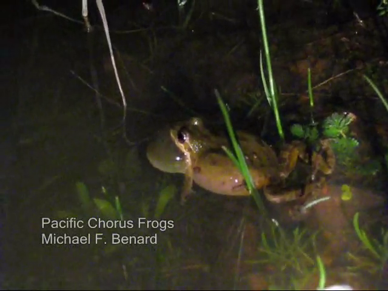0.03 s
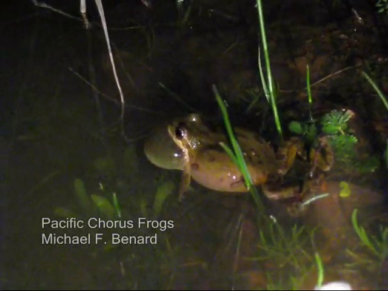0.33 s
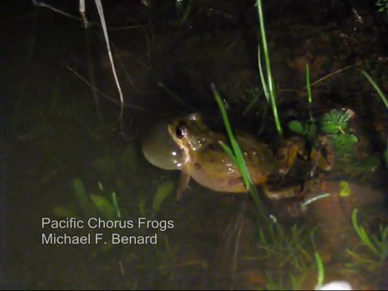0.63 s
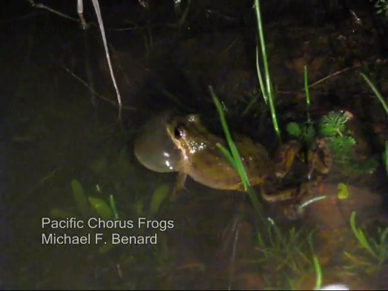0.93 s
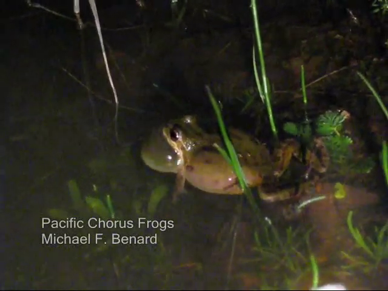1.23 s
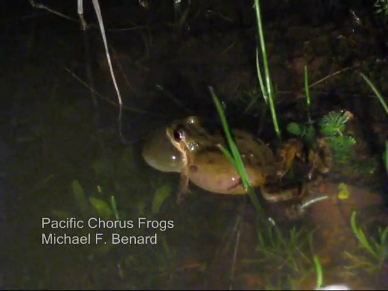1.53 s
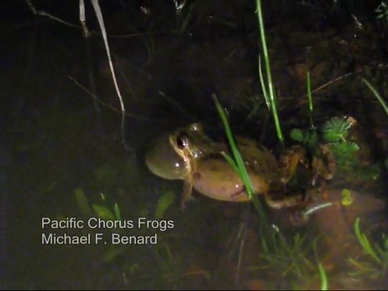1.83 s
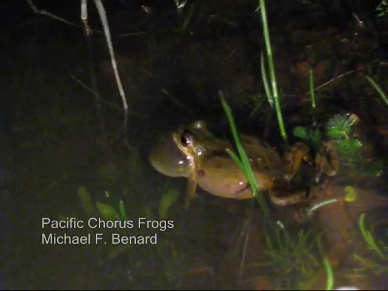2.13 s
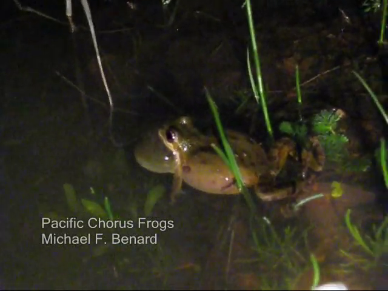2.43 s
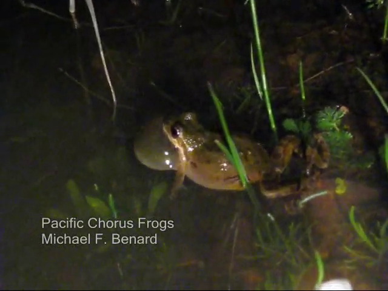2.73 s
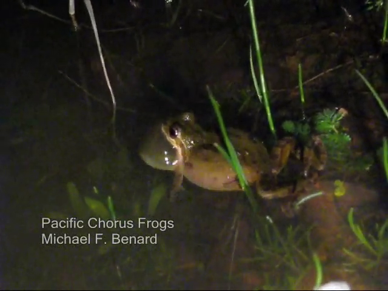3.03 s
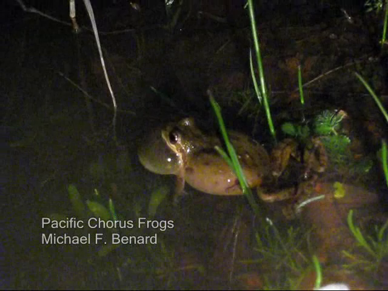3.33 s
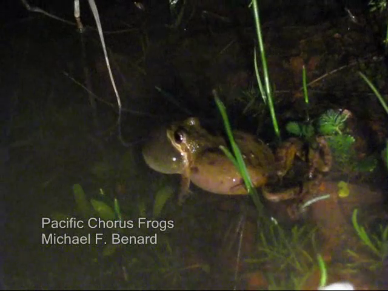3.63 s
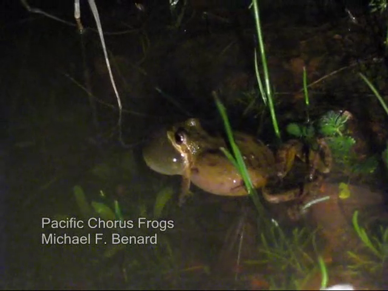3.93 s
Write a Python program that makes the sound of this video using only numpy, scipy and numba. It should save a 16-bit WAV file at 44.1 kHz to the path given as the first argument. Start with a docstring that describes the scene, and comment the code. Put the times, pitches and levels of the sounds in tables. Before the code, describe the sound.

Frogs croak in high, rapid pulses, near and far, beside water at night. Three brief chirps from a nearby frog alternate with two loud rising trills at the microphone, each briefly pushing down the chorus, over faint hiss.

```python
"""A chorus of frogs trills around a pond at night, over a faint hiss. Every call is a train of short
ringing pulses from a vocal sac, most often climbing in pitch. Neighbours and a far crowd form the bed;
one close frog gives three short notes, and another, right at the microphone, calls twice.
The recorder's gain control ducks the chorus under each close call and lets it swell back."""
import sys
import numpy as np
from scipy import signal
from scipy.fft import rfft, irfft
from scipy.io import wavfile
from scipy.ndimage import uniform_filter1d
from numba import njit

SR = 44100
rng = np.random.default_rng(int(sys.argv[2]) if len(sys.argv) > 2 else 0)


def inscribe(sig):
    """Save sig as 16-bit PCM at rate SR to the path in sys.argv[1].

    A 1-D sig is mono; a 2-D sig holds one channel per row.
    Samples are clipped to [-1, 1] before scaling.
    """
    pcm = np.round(np.clip(np.atleast_2d(sig).T, -1, 1) * 32767)
    wavfile.write(sys.argv[1], SR, pcm.astype(np.int16))


N = 176400


def amp(db):
    return 10 ** (np.asarray(db) / 20)


def unit_rms(x):
    return x / np.sqrt(np.mean(x ** 2) + 1e-20)


def add(mix, start_s, sound):
    """Lays a sound into the mix, trimming what overhangs either end."""
    at = int(round(start_s * SR))
    sound = sound[max(-at, 0):]
    part = mix[max(at, 0):][:len(sound)]
    part += sound[:len(part)]


def noise(spectrum):
    """Noise of unit level, coloured by an EQ curve."""
    hz, db = np.transpose(spectrum)
    shape = amp(np.interp(np.log(np.fft.rfftfreq(N, 1 / SR) + 1), np.log(hz), db))
    return unit_rms(irfft(rfft(rng.standard_normal(N)) * shape, N))


def pond(x, wet_db, t60_s=.081):
    """Adds short scattered echoes from water, bank and plants."""
    t = np.arange(SR // 4) / SR
    echoes = rng.standard_normal(len(t)) * (rng.random(len(t)) < .05) * amp(-60 * t / t60_s)
    return x + amp(wet_db) * signal.fftconvolve(x, echoes / np.linalg.norm(echoes))[:N]


def sac_pulse(hz, swell_ms, decay_ms, voice_db, edge, attack_ms=.18, length_ms=17, fade_ms=4.2):
    """One pulse of the vocal sac: it snaps on, swells, rings down and stops."""
    ms = np.arange(0, length_ms, 1000 / SR)
    snap = edge ** swell_ms  # a slow swell starts softer
    swell = snap + (1 - snap) * np.sin(np.pi / 2 * np.minimum(ms / swell_ms, 1))
    attack = 1 - np.exp(-ms / attack_ms)
    decay = np.exp(-np.maximum(ms - swell_ms, 0) / decay_ms)
    fade = np.minimum((length_ms - ms) / fade_ms, 1)
    phase = np.pi * hz * np.arange(len(ms)) / SR  # partials at 1/2, 1, 3/2 and 2 times the pitch
    tone = sum(amp(db) * np.sin((k + 1) * phase) for k, db in enumerate(voice_db))
    return attack * swell * decay * fade * tone


def far_call(count, rate_hz, first_hz, last_hz, first_db, last_db, tones=(), jitter_s=.0003):
    """A farther frog's call: slightly uneven pulses that glide in pitch and level."""
    # partials of a far voice: level_db
    voice_db = [-12, -0.5, -26, -47]
    out, count = np.zeros(SR // 2), round(count)
    for k, (late, loud) in enumerate(rng.standard_normal((count, 2))):
        progress = k / max(count - 1, 1)
        start_s = k / rate_hz + jitter_s * late
        hz = first_hz + progress * (last_hz - first_hz)
        gain = amp(first_db + progress * (last_db - first_db) + 1.26 * loud)
        add(out, start_s, gain * sac_pulse(hz, swell_ms=2.32, decay_ms=2.07, voice_db=voice_db, edge=.68))
        if len(tones):
            add(out, start_s, gain * recorder_tones(hz, tones))
    return out


def crowd(count=130, call_s=.16, rate_hz=75, spread=.06, climb=.037, uneven_db=4):
    """Many far frogs overlap, their pitch and loudness moving in waves."""
    # waves of the crowd: time_s, mean_pitch_hz, level_db
    waves = [(0, 2173, -13.5), (.2, 2234, -24.5), (.3, 2053, -12.5), (.45, 2060, -15.5), (.6, 2300, -23.5),
             (.68, 2010, -9), (.95, 2240, -17), (1.2, 2107, -12), (1.45, 2169, -11), (1.56, 2103, -12),
             (1.86, 2146, -19), (1.94, 2017, -13.5), (2.28, 2200, -21), (2.34, 2027, -15), (2.62, 2247, -7),
             (3.02, 2180, -21.5), (3.25, 2068, -12.5), (3.58, 2240, -14.5), (3.85, 2077, -17.5),
             (4, 2230, -20)]
    time_s, hz, db = np.transpose(waves)
    out, starts = np.zeros(N), np.linspace(-call_s, N / SR, count)
    for start, (late, detune, pace, loud) in zip(starts, rng.uniform(-1, 1, (count, 4))):
        pitch = np.interp([start, start + call_s], time_s, hz) * (1 + spread * detune)
        glide_hz = pitch * [1 - climb, 1 + climb]
        level_db = uneven_db * loud
        call = far_call(call_s * rate_hz, rate_hz * (1 + .1 * pace), *glide_hz, level_db, level_db)
        add(out, start + late / rate_hz, call)
    return unit_rms(pond(out, wet_db=-3.5)) * amp(np.interp(np.arange(N) / SR, time_s, db))


def hiss(level_db=-55.5):
    """A faint, steady noise floor under the chorus."""
    # colour of the hiss: frequency_hz, level_db
    spectrum = [(20, 4), (100, 6), (300, -4), (700, -5), (3000, -3.5), (6000, -5.5), (10000, -12.5),
                (16000, -17.5)]
    return amp(level_db) * noise(spectrum)


def neighbours():
    """Frogs a few metres off whose calls stand out of the crowd."""
    # calls: first_pulse_s, last_pulse_s, pulses, first_pitch_hz, last_pitch_hz, first_db, last_db
    calls = [(.0084, .052, 4, 2200, 2210, 0.5, -1.5), (.076, 0.117, 4, 2140, 2180, -11.5, -9),
             (.217, 0.243, 3, 2276, 2180, -8, -11.5), (.305, .367, 5, 1980, 2017, -12, -1.5),
             (0.385, 0.6163, 18, 1987, 2260, -7.5, -7), (1.097, 1.143, 4, 2114, 2170, -9.5, -8.5),
             (1.1556, 1.378, 18, 1967, 2184, -6.5, 2), (1.3962, 1.49, 8, 2146, 2260, -10.5, -7.5),
             (1.529, 1.609, 7, 1940, 2130, -12, -5), (1.6506, 1.756, 9, 2115, 2296, -6, -2.5),
             (1.798, 1.867, 6, 2206, 2320, -5, 3), (2.0651, 2.172, 9, 2146, 2236, -7, -6.5),
             (2.2406, 2.2894, 5, 2310, 2336, -1.5, -3.5), (2.4359, 2.504, 6, 2073, 2160, -2.5, 0.5),
             (2.5392, 2.669, 11, 2220, 2140, -12.5, -0.5), (3.1543, 3.3085, 13, 1983, 2010, -8, -7.5),
             (3.3506, 3.487, 10, 2145, 2010, -3, -13), (3.5037, 3.554, 5, 2190, 2350, 0.5, -2.5),
             (3.6547, 3.793, 11, 2170, 2237, -7.5, -2), (3.8057, 3.887, 7, 1920, 2104, -20, -2),
             (3.953, 3.993, 4, 2215, 2344, -11.5, -13.5)]
    # the recorder's treble tones: frequency_hz, slope_hz_per_hz, level_db
    tones = [(9200, -4.5, -52), (11700, -4.5, -51.5)]
    out = np.zeros(N)
    for start_s, end_s, count, *glide in calls:
        rate_hz = (count - 1) / (end_s - start_s)
        add(out, start_s, far_call(count, rate_hz, *glide, tones))
    return pond(out, wet_db=-9)


def recorder_tones(pitch_hz, tones, peak_ms=1.8, pivot_hz=2150):
    """Faint, thin treble tones from the recorder that accompany a frog pulse, lower as its pitch climbs."""
    t = np.arange(SR // 50) / SR
    age = 1000 * t / peak_ms
    offset_hz = pitch_hz - pivot_hz
    treble = sum(amp(db) * np.sin(2 * np.pi * (hz + slope * offset_hz) * t) for hz, slope, db in tones)
    return age * np.exp(1 - age) * treble


def click(ring_hz=2870, rasp_hz=3980, rasp_db=-10, peak_ms=.34):
    """The bright snap that starts a close pulse: two short resonances."""
    t = np.arange(SR // 200) / SR
    age = 1000 * t / peak_ms
    ring = np.sin(2 * np.pi * ring_hz * t) + amp(rasp_db) * np.sin(2 * np.pi * rasp_hz * t)
    return age * np.exp(1 - age) * ring


def close_frog(calls, course, gaps, edge=.47):
    """A frog near the microphone, almost dry: each call follows the same course, pulse by pulse."""
    # partials of a close voice: level_db
    voice_db = [-16.5, -2, -27, -42]
    # the recorder's treble tones: frequency_hz, slope_hz_per_hz, level_db
    tones = [(8750, -2.4, -47), (13950, -4.5, -49)]
    out = np.zeros(N)
    pulses_left, *curves = np.transpose(course)
    for start_s, count, call_db in calls:
        for left in reversed(range(count)):
            hz, db, swell_ms, decay_ms = (np.interp(left, pulses_left, curve) for curve in curves)
            body = sac_pulse(hz, swell_ms, decay_ms, voice_db, edge)
            snap = amp(-14) * edge ** swell_ms * click()  # weaker when the pulse swells slowly
            for part in body, snap, recorder_tones(hz, tones):
                add(out, start_s, amp(call_db + db) * part)
            start_s += np.interp(left, *np.transpose(gaps)) / 1000
    return pond(out, wet_db=-24)


def short_notes():
    """A frog close by gives three chirps of four pulses each."""
    # notes: start_s, pulses, level_db
    notes = [(.1526, 4, 6.5), (1.9717, 4, 4.5), (3.897, 4, 5)]
    # shape of a note: pulses_left, pitch_hz, level_db, swell_ms, decay_ms
    course = [(0, 2450, -7, 3.2, 6), (1, 2335, -0.5, 2.7, 2.6), (2, 2320, 1, 3.1, 2.1),
              (3, 2395, -2, 1, 4.7)]
    # pulse spacing: pulses_left, gap_ms
    gaps = [(1, 15.5), (2, 14), (3, 13.6)]
    return close_frog(notes, course, gaps)


def close_calls():
    """The closest frog gives two loud, rising trills."""
    # calls: start_s, pulses, level_db
    calls = [(.7012, 19, 23), (2.6895, 20, 22)]
    # shape of a call: pulses_left, pitch_hz, level_db, swell_ms, decay_ms
    course = [(0, 2340, -4, 1.4, 5.3), (1, 2270, -0.5, 3.6, 6.9), (2, 2230, 2, 2.8, 3),
              (4, 2235, 1.5, 1.8, 3), (6, 2180, -5.5, 0.71, 3), (7, 2150, -3.5, 0.45, 3),
              (9, 2140, -5.5, 0.33, 2.8), (11, 2107, -1.5, 3.6, 2.8), (14, 2110, 4, 3, 2.8),
              (16, 2055, -1.5, 1.9, 2.7), (17, 2120, -4, 0.6, 5), (19, 2060, -8.5, 0.71, 1.8)]
    # pulse spacing: pulses_left, gap_ms
    gaps = [(1, 11), (2, 13), (4, 12.9), (6, 12), (7, 13.6), (11, 13.5), (14, 13.3), (16, 12.3), (17, 13.1),
            (19, 12.3)]
    return close_frog(calls, course, gaps)


def scene():
    """Close frogs, neighbours and the crowd, whose small vocal sacs radiate no bass, over the hiss."""
    frogs = close_calls() + short_notes() + neighbours() + crowd()
    low_cut = signal.butter(8, 805, "high", fs=SR, output="sos")
    return (signal.sosfilt(low_cut, frogs) + hiss())[None]


def grit(x, level_db=-24.5):
    """Grainy noise that rides on the loudness of the signal."""
    # colour of the grit: frequency_hz, level_db
    spectrum = [(20, -8), (200, -4.5), (600, -6), (1500, -0.5), (2800, 10), (4000, 1.5), (5200, -11),
                (6500, -16.5), (9500, -19), (16000, -26)]
    loudness = np.sqrt(abs(uniform_filter1d(x ** 2, size=44)))
    return amp(level_db) * noise(spectrum) * loudness


@njit
def follow(rectified, limit, rise, fall):
    """Level detector: charges quickly on peaks and drains slowly down to the limit."""
    out, level = np.empty(len(rectified)), limit
    for i in range(len(rectified)):
        level = max(level * fall + rise * max(rectified[i] - level, 0.), limit)
        out[i] = level
    return out


def gain_control(x, limit_db=-12.5, attack_s=.0047, release_db_per_s=161):
    """Ducks the whole mix under loud peaks and lets it swell back."""
    limit = float(amp(limit_db))
    level = follow(abs(x), limit, 1 / (attack_s * SR), float(amp(-release_db_per_s / SR)))
    return x * limit / level


def overload(x, knee=.47, bend_db=-21.5):
    """The input clips, and above the knee it bends unevenly, adding a low pop and a rasp."""
    x = np.clip(x, -1, 1)
    return x - amp(bend_db) * np.maximum(abs(x) - knee, 0) ** 2 / knee


def record(dry, notch_hz=7820, notch_width_hz=970, high_cut_hz=15750):
    """Gain control, overload and grit, then a treble notch and a steep high cut."""
    x = overload(gain_control(dry[0]))
    x = x + grit(x)
    hz = np.fft.rfftfreq(N, 1 / SR)
    notch = 1 - np.exp(-((hz - notch_hz) / (notch_width_hz / 2)) ** 2)
    x = irfft(rfft(x) * notch, N)
    high_cut = signal.firwin(511, high_cut_hz, window=("kaiser", 9), fs=SR)
    return signal.oaconvolve(x, high_cut, "same")[None]


dry = scene()
out = record(dry)
inscribe(out)
```